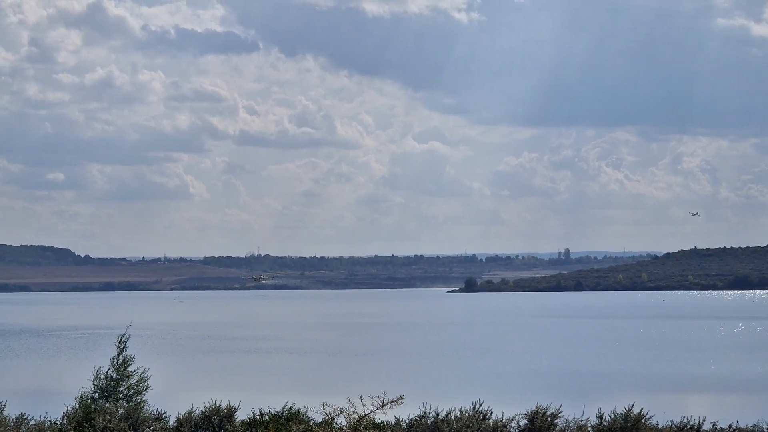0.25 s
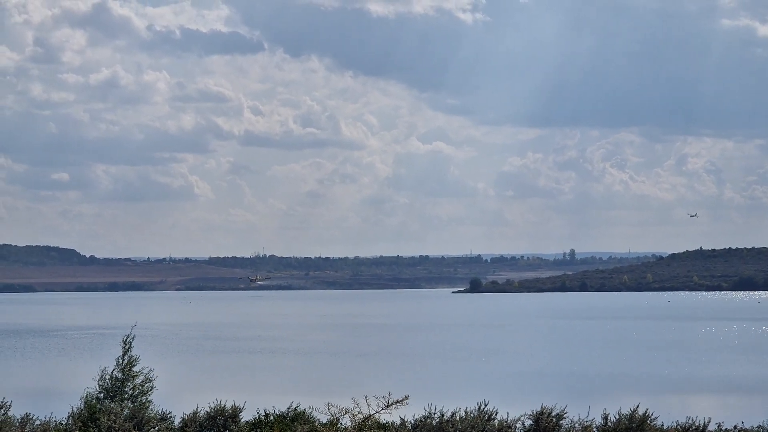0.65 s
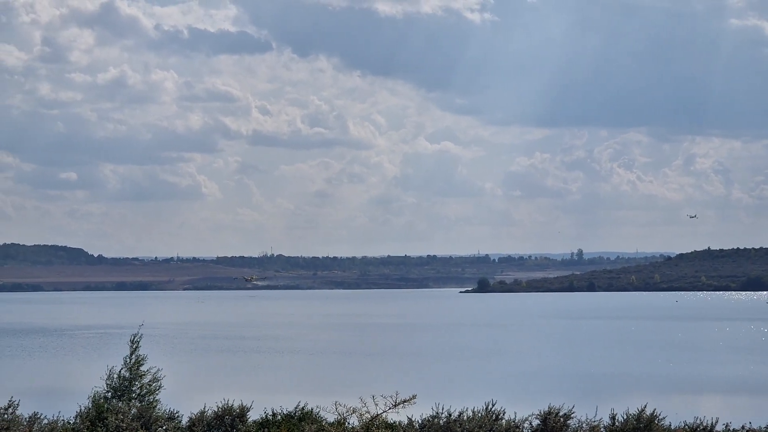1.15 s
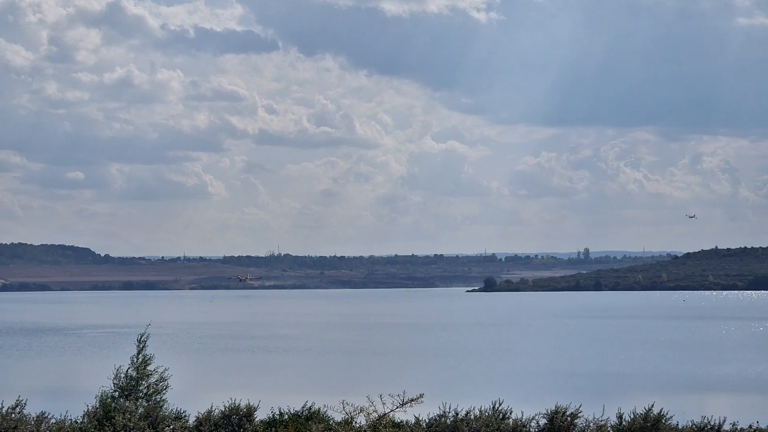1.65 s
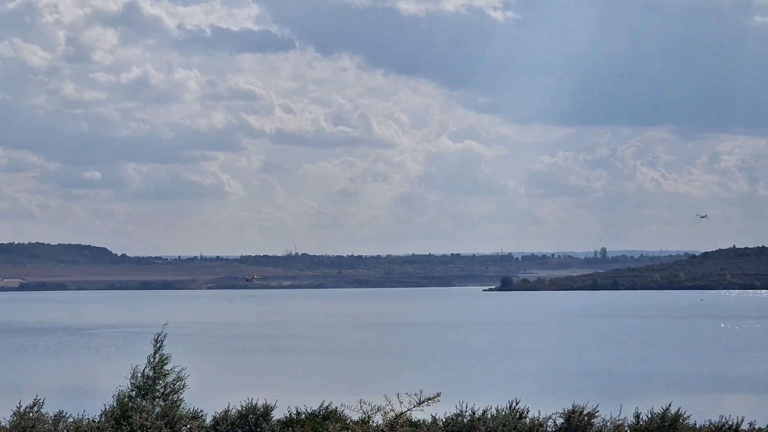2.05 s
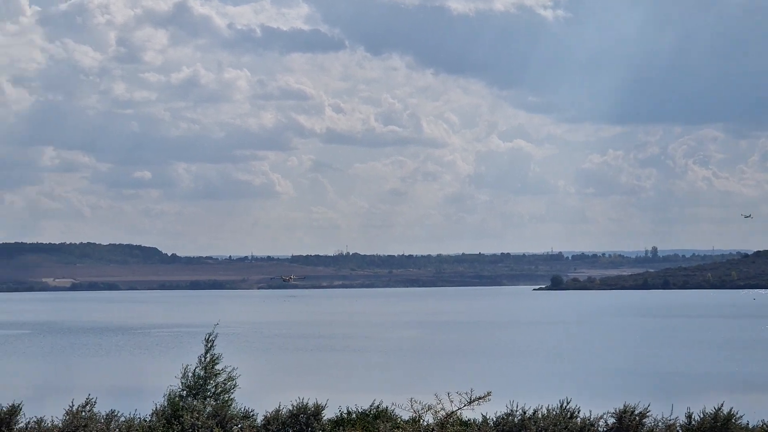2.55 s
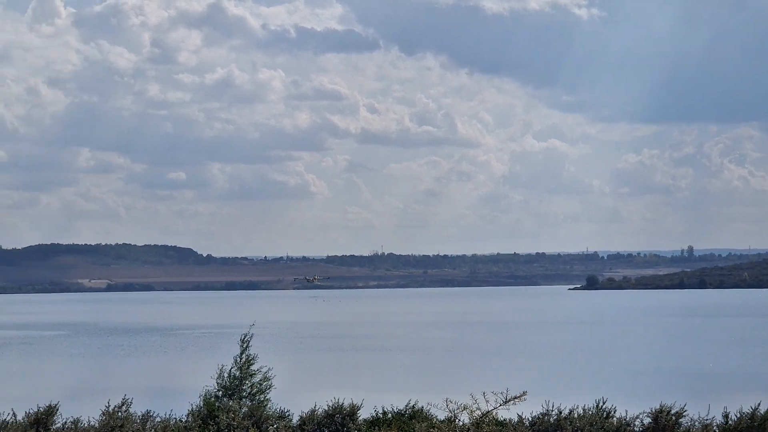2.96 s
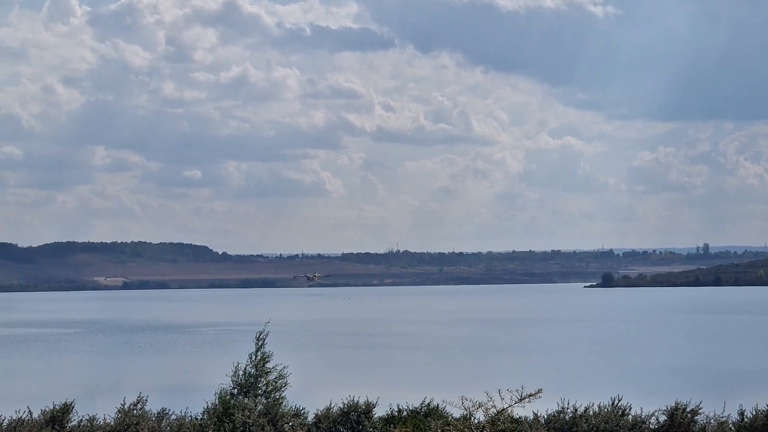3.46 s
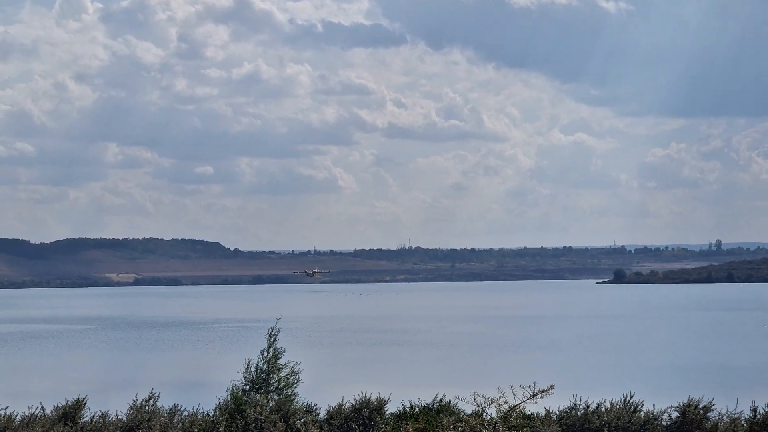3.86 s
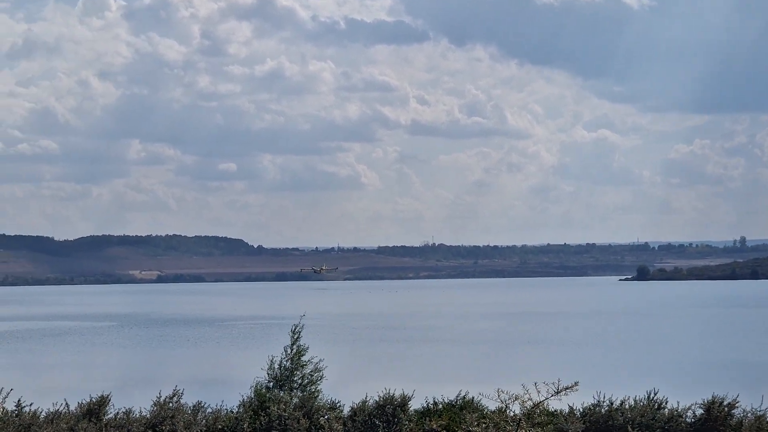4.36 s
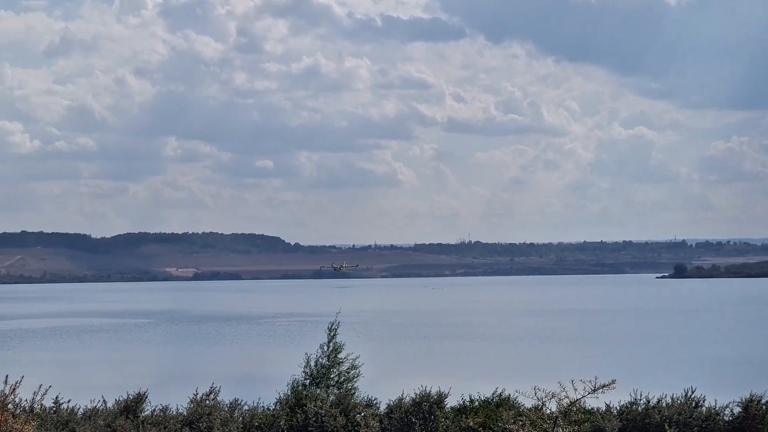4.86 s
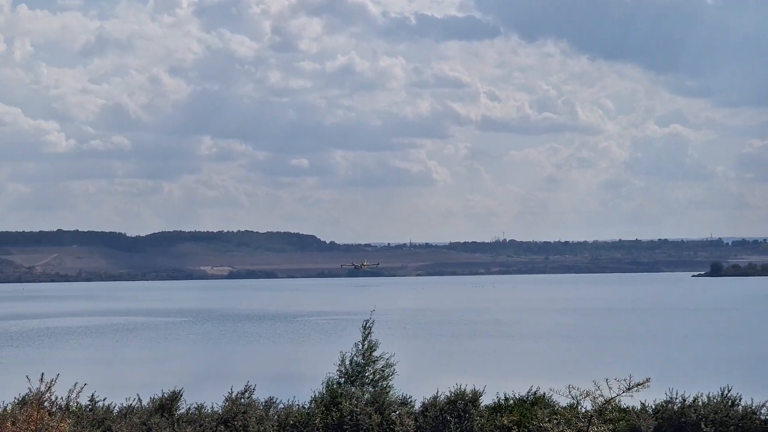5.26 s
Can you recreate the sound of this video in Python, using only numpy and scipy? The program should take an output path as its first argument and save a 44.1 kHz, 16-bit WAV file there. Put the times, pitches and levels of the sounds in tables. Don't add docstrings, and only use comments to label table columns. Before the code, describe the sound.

A steady low drone of propeller blades and uneven engine growl comes in over water, pulsing and drifting, gaining a brighter roar and thin whistling edges as it nears. A stereo microphone in shoreline grass catches light handling-like scuffs, mostly left at first, a dull snap around one second, and a cluster of dry stalk cracks at right just after five seconds. The background is quiet hiss, leaves and low breeze.

```python
import sys
import numpy as np
from scipy import signal
from scipy.fft import rfft, irfft
from scipy.io import wavfile
from scipy.ndimage import uniform_filter1d

SR = 44100
rng = np.random.default_rng(int(sys.argv[2]) if len(sys.argv) > 2 else 0)


def digitize_waveform(pressure):
    field = np.atleast_2d(pressure).T
    bounded = np.clip(field, -1, 1)
    quanta = np.round(bounded * 32767).astype(np.int16)
    wavfile.write(sys.argv[1], SR, quanta)


def decibels_to_gain(level_db):
    exponent = np.asarray(level_db, float) / 20
    return 10 ** exponent


N = 242988
T = np.arange(N) / SR

# (time [s], blade rate [Hz], level [dB])
APPROACH = [(0, 93.55, -33), (.28, 94.2, -31.5), (.43, 93.2, -27.5), (.57, 93.3, -32.5), (.9, 94.06, -28),
            (1.35, 94.12, -33.5), (1.95, 94.23, -32.5), (2.26, 94.28, -28.5), (2.54, 94.33, -28),
            (2.68, 94.35, -31.5), (2.95, 94.2, -29.7), (3.45, 94.62, -33.5), (4.1, 94.65, -31.3),
            (4.38, 94.73, -30), (4.8, 95.22, -23.5), (5.23, 95.5, -22.5), (5.37, 95.77, -23.5),
            (5.51, 95.4, -22)]
# (time [s], roar gain [dB], nearness [0-1], crest of the water echo [Hz])
AIR_PATH = [(0, -2.5, 0.5, 1266), (.5, 2, 0, 1345), (1, 1, 0.12, 988), (1.5, -1.5, 0, 1460),
            (2, 0, 0.1, 1460), (2.4, 1, .2, 1397), (2.7, 1.5, 0.09, 1403), (3, 1.5, 0.41, 1410),
            (3.3, 1.5, 0.4, 1380), (3.7, 4.5, .5, 1440), (4, 5, 0.7, 1450), (4.3, 8, 1, 1493),
            (4.6, 8.5, 1, 1400), (5, 10.5, 0.99, 1210), (5.51, 11.5, 0.6, 1053)]

# (time [s], peak level [dB], length [s])
SECOND_SWELLS = [(.45, -49.5, 0.22), (.9, -44.5, 0.63), (1.7, -47, 0.21), (1.98, -51, 0.14),
                 (2.4, -44, .35), (2.97, -44.5, 0.21), (3.25, -49, .25), (3.53, -45.5, .22),
                 (3.95, -46.5, .5), (4.38, -40.5, 0.35), (4.75, -36.5, .45), (5.15, -33.5, 0.77),
                 (5.51, -35, 0.27)]
THIRD_SWELLS = [
    (.9, -53.5, 0.52),
    (1.65, -55.5, 0.46),
    (2.25, -50, 0.41),
    (3.0, -54, 0.32),
    (3.6, -57, 0.49),
    (4.621, -48.5, 0.62),
    (5.15, -46.5, .9),
]
FOURTH_SWELLS = [
    (1.5, -61.5, 0.34),
    (2.001, -60, .3),
    (2.85, -54.5, .9),
    (4.0, -58, 0.32),
    (5.03, -55, 0.61),
    (5.51, -51, 0.35),
]
SIXTH_SWELLS = [
    (1.8, -64.5, 0.57),
    (2.45, -63.5, .4),
    (3.4, -58.5, .45),
    (4.98, -54.5, 0.56),
]
# (time [s], peak level [dB], length [s])
ORDER_3_SWELLS = [
    (0.195, -47, 0.97),
    (1.001, -43.5, 0.3),
    (1.905, -49.5, 0.66),
    (2.799, -48.5, 1.11),
    (4.488, -53.5, .3),
    (5.099, -55.5, .45),
    (5.51, -43, 0.47),
]
ORDER_5_SWELLS = [(.62, -54.5, 0.34), (1.13, -56.5, 0.17), (1.77, -48.5, .25), (2.45, -50.5, 0.25),
                  (2.9, -41.5, 0.28), (3.25, -38, 0.23), (3.6, -36.5, .3), (3.9, -38.5, .3),
                  (4.24, -38, .2), (4.52, -37, 0.18), (5.51, -44, .2)]
ORDER_6_SWELLS = [
    (2.2, -55, 0.31),
    (3.099, -49.5, 0.68),
    (3.55, -43, 0.48),
    (4.15, -42.5, .6),
    (5.151, -43, 0.75),
    (5.5, -46, 0.23),
]
RESTING_DB = (-56, -66.5, -68.5, -70, -71, -61.5, -66.5)
# (multiple of the blade rate, level against the second [dB])
HIGH_OVERTONES = [(5, -27), (7, -31), (8, -33), (9, -32), (10, -28), (11, -30), (12, -28), (13, -28)]
# (multiple of the shaft rate, level against the exhaust rumble [dB])
FIRING_ORDERS = [
    (2, -23),
    (4.5, -16.5),
    (7, -20),
    (9, -23.5),
    (11, -21),
]

# (frequency [Hz], level [dB per Hz])
RUMBLE_SPECTRUM = [(24, -45.5), (40, -26), (68, -8.5), (104, 1.5), (121, -2.5), (151, -11), (204, -10.5),
                   (427, -29), (570, -38), (697, -59), (800, -34), (1040, -64), (1760, -120)]
# (frequency [Hz], level [dB per Hz])
FAR_ROAR = [(260, -31.5), (450, -2), (551, -0.5), (706, -5), (820, -2.5), (1160, -9.5), (1390, -8),
            (1590, -12), (1930, -16.5), (2700, -42.5), (3510, -62), (5940, -120)]
# (frequency [Hz], level [dB per Hz])
NEAR_ROAR = [(300, -30.5), (450, -6), (580, -1), (760, -10), (1000, -3), (1200, -2.5), (1450, -0.5),
             (1600, -5.5), (1700, -1.5), (1950, -16), (2120, -12.5), (2450, -31.5), (2700, -36),
             (3500, -62)]
# (centre [Hz], half width [Hz])
UPPER_ROAR = (2200, 260)
# (centre [Hz], width [Hz])
WHISTLE_BANDS = [
    (2960, 330),
    (3390, 270),
]
WHISTLE_DB = (-94, -95.5)
# (time [s], peak level [dB], length [s])
LOW_WHISTLE_FLARES = [
    (.15, -77.5, .05),
    (3.42, -83, .2),
    (4.05, -79, .1),
    (5.03, -68, .2),
    (5.24, -68, .1),
    (5.38, -69, .22),
]
# (time [s], peak level [dB], length [s])
HIGH_WHISTLE_FLARES = [
    (.15, -78, .05),
    (3.5, -82, .1),
    (4.13, -74, .12),
    (4.25, -77, .1),
    (4.98, -68.5, .26),
    (5.32, -72, .08),
]

# (frequency [Hz], level [dB per Hz])
FLOOR_SPECTRUM = [(1500, -21.5), (2300, -1), (3200, -0.5), (4200, -10.5), (5200, -14), (6400, -7),
                  (7100, -6.5), (7450, 0), (8600, -1.5), (9500, -11), (11000, -17.5), (15500, -16.5),
                  (17000, -28.5)]
# (frequency [Hz], level [dB per Hz])
BREEZE_SPECTRUM = [(15, -30), (30, -7.5), (45, 11.5), (75, 7.5), (110, 2), (200, -6.5), (400, -8),
                   (800, -52.5)]

# (time [s], peak level [dB], length [s])
GRASS_RUSTLES = [(.17, -82.5, .08), (.29, -86, .2), (.7, -88.5, .25), (1.0, -85.5, 0.19),
                 (1.64, -79.5, 0.083), (2.05, -82.5, 0.18), (2.29, -77.5, .12), (2.57, -85, .15),
                 (3.05, -86.5, 0.28), (3.33, -86, .12), (4.1, -82.5, 0.35), (4.36, -80.5, 0.23),
                 (4.55, -81.5, 0.26), (4.7, -74, 0.13), (4.77, -68.5, 0.081), (4.87, -75.5, 0.081),
                 (5.03, -70.5, 0.12), (5.15, -72.5, 0.18), (5.27, -74, 0.16), (4.93, -80, .12),
                 (5.4, -82, .25), (1.35, -88, .3), (2.76, -87, .2), (.45, -87.5, .12), (3.9, -87, .15),
                 (1.93, -86, .08)]
# (frequency [Hz], level [dB per Hz])
GRASS_SPECTRUM = [(2500, -19.5), (4200, -3.5), (5500, -1.5), (7500, 0.5), (9800, -4), (11000, -2.5),
                  (12200, -7.5), (15500, -6), (17000, -20)]
# (time [s], level [dB], centre [Hz], length [s], left minus right [dB])
CLOSE_SCUFFS = [(0.106, -77.5, 3500, .079, 12), (.13, -75.5, 5600, .035, 12), (.191, -67.5, 2100, 0.032, 9),
                (0.377, -78, 2705, .06, 17), (0.521, -77.5, 2400, .05, 15), (2.019, -76, 2630, .022, 6.5),
                (3.487, -78, 3311, .081, 6.5), (2.599, -86.5, 4455, .03, 3.5), (2.9, -82, 4990, .023, 1),
                (3.119, -76, 5712, 0.069, 9), (4.038, -64.5, 2430, 0.049, 11), (4.047, -73, 3400, .019, 17),
                (4.097, -72.5, 3401, 0.043, 15), (4.098, -74, 2587, .03, 9), (5.105, -69.5, 6700, .05, -8),
                (5.159, -65.5, 5640, 0.057, -4), (5.224, -71.5, 5680, 0.064, -12),
                (5.228, -69, 2590, 0.052, -5)]
# (time [s], peak level [dB], ring [Hz], left minus right [dB])
STALK_SNAPS = [
    (.915, -52.5, 2060, 13),
    (1.638, -56, 2350, 0),
    (1.638, -73, 4628, -2),
    (2.7485, -67, 7212, 0.5),
    (4.665, -63, 7050, -8.5),
    (5.125, -63.5, 6980, -10),
    (5.1423, -39.5, 6300, -9.5),
    (5.147, -56, 6500, -11.5),
    (5.174, -60, 5483, -3),
    (5.18, -45, 5750, -14),
]

# (frequency [Hz], correlation [-1 to 1])
MIC_LIKENESS = [(30, .95), (65, .88), (110, .93), (150, .995), (300, .99), (600, .87), (1250, .9),
                (2500, .58), (5000, .25), (12000, .05)]
# (frequency [Hz], left minus right [dB])
MIC_LEAN = [(100, 0), (300, .2), (1000, .5), (2500, -1), (5000, -1.5), (7500, -1), (9000, -3), (10000, -7),
            (11200, -3), (12300, 2.5), (15000, 3)]


def evened(x):
    return x / np.sqrt(np.mean(x ** 2) + 1e-20)


def read(points, hz):
    f, value = np.transpose(points)
    return np.interp(np.log(hz + 1), np.log(f + 1), value)


def curves(rows, t):
    s, *columns = np.transpose(rows)
    return [np.interp(t, s, column) for column in columns]


def drift(top_hz):
    t = T[::200]
    rates = np.geomspace(top_hz / 10, top_hz, 16)
    slow = sum(np.sin(2 * np.pi * (f * t + rng.random())) / np.sqrt(f) for f in rates)
    return np.interp(T, t, evened(slow))


def swells(rows, rest_db):
    power = decibels_to_gain(rest_db) ** 2
    for s, db, length in rows:
        power = power + decibels_to_gain(db) ** 2 * np.exp(-8 * ((T - s) / length) ** 2)
    return 10 * np.log10(power)


def sides(x, lean_db):
    return np.array([x * decibels_to_gain(lean_db / 2), x * decibels_to_gain(-lean_db / 2)])


def resonate(x, hz, width):
    turn = np.exp(2j * np.pi * hz * np.arange(x.shape[-1]) / SR)
    r = np.exp(-np.pi * width / SR)
    return 2 * (turn * signal.lfilter([(1 - r) ** 2], [1, -2 * r, r * r], x / turn)).real


def air_noise(colour_db, size, patchy_db, likeness, patch_hz=400, patch_s=0.088):
    hz = np.fft.rfftfreq(size, 1 / SR)[:, None]
    t = np.arange(4 * N // size + 5) * size / 4 / SR
    a, b, c, d, patches = rng.standard_normal((len(t), len(hz), 5)).T
    patches = uniform_filter1d(patches, 1 + int(patch_hz / hz[1, 0]), 0)
    patches = evened(uniform_filter1d(patches, 1 + int(patch_s / t[1]), 1))
    same = np.clip(likeness * read(MIC_LIKENESS, hz), -1, 1)
    left = a + 1j * b
    right = same * left + np.sqrt(1 - same ** 2) * (c + 1j * d)
    spectra = np.array([left, right]) * decibels_to_gain(colour_db(hz, t) + patchy_db * patches)
    return evened(signal.istft(spectra, nperseg=size, noverlap=3 * size // 4)[1][:, :N])


def blade_motion():
    blade_hz, _ = curves(APPROACH, T)
    turn = 2 * np.pi * np.cumsum(blade_hz) / SR
    skew = np.interp(T, [0, 2.8, 4.2, 5.5], [-1.4, 1.2, .6, 2.9])
    return turn, skew


def rumble_level():
    return -53 + 2.5 * T


def shaft_tones(turn, skew):
    _, blade_db = curves(APPROACH, T)
    second_db = swells(SECOND_SWELLS, RESTING_DB[0])
    order_5_db = swells(ORDER_5_SWELLS, RESTING_DB[1])
    tones = decibels_to_gain(blade_db) * np.cos(turn) + decibels_to_gain(second_db) * np.cos(2 * turn + skew)
    tones += decibels_to_gain(order_5_db) * np.cos(5 / 4 * turn + 0.28 * drift(3.7))
    fading = (THIRD_SWELLS, FOURTH_SWELLS, SIXTH_SWELLS, ORDER_3_SWELLS, ORDER_6_SWELLS)
    for k, rows, rest_db in zip((3, 4, 6, 3 / 4, 6 / 4), fading, RESTING_DB[2:]):
        level = decibels_to_gain(swells(rows, rest_db) + 2.5 * drift(12.0))
        tones += level * np.cos(k * turn + (k - 1) * skew + .17 * k * drift(8.0))
    for k, db in HIGH_OVERTONES:
        level = decibels_to_gain(second_db + db + 3.0 * drift(6.0))
        tones += level * np.cos(k * turn + (k - 1) * skew + .16 * k * drift(8.0))
    for k, db in FIRING_ORDERS:
        level = decibels_to_gain(rumble_level() + 7.0 + db + 3.1 * drift(2.5))
        tones += level * np.cos(k / 4 * turn + 2.03 * drift(1.6))
    return np.sqrt(2) * tones


def exhaust_rumble():
    rumble = air_noise(lambda hz, t: read(RUMBLE_SPECTRUM, hz), size=4096, patchy_db=2.5, likeness=1,
                       patch_hz=70, patch_s=.1)
    return decibels_to_gain(rumble_level() + 7.5) * rumble


def roar_colour(hz, t):
    _, near, crest_hz = curves(AIR_PATH, t)
    upper_db = 2 + 4 * np.cos(2 * np.pi * (t - 2.6) / 1.75)
    centre_hz, half_width_hz = UPPER_ROAR
    upper = upper_db * np.exp(-((hz - centre_hz) / half_width_hz) ** 2)
    crest = 3.7 * np.exp(-((hz - crest_hz) / 230) ** 2)
    dip = 2.3 * np.exp(-((hz - crest_hz / 2) / 110) ** 2)
    return (1 - near) * read(FAR_ROAR, hz) + near * read(NEAR_ROAR, hz) + upper + crest - dip


def propeller_roar(turn, skew):
    gain_db = curves(AIR_PATH, T)[0]
    roar = air_noise(roar_colour, size=2048, patchy_db=2.4, likeness=1.02, patch_hz=130, patch_s=.14)
    roar /= np.sqrt(uniform_filter1d((roar ** 2).mean(0), 15000))
    hiss = rng.standard_normal((N, 2)).T
    hiss = hiss + 0.84 * hiss[0]
    whistles = 0
    for rows, db, band in zip((LOW_WHISTLE_FLARES, HIGH_WHISTLE_FLARES), WHISTLE_DB, WHISTLE_BANDS):
        level_db = swells(rows, db + 1.5 * gain_db)
        whistles = whistles + decibels_to_gain(level_db) * evened(resonate(hiss, *band))
    chop = 1 + .03 * np.cos(turn + skew) + .06 * np.cos(2 * turn)
    return chop * (decibels_to_gain(gain_db - 55) * roar + whistles)


def aircraft():
    turn, skew = blade_motion()
    return shaft_tones(turn, skew) + exhaust_rumble() + propeller_roar(turn, skew)


def shore_floor():
    hiss = air_noise(lambda hz, t: read(FLOOR_SPECTRUM, hz), size=512, patchy_db=.7, likeness=.6)
    breeze = air_noise(lambda hz, t: read(BREEZE_SPECTRUM, hz), size=4096, patchy_db=4.5, likeness=0.85,
                       patch_hz=60, patch_s=.2)
    gusts = decibels_to_gain(0.84 * drift(7.9))
    return decibels_to_gain(-80) * gusts * hiss + decibels_to_gain(-46.5) * breeze


def rustle():
    noise = air_noise(lambda hz, t: read(GRASS_SPECTRUM, hz), size=256, patchy_db=1.6, likeness=.5)
    grain = decibels_to_gain(1.8 * evened(uniform_filter1d(rng.standard_normal(N), 90)))
    return decibels_to_gain(swells(GRASS_RUSTLES, -90) + 2.5) * evened(grain) * noise


def scuffs():
    out = np.zeros((2, N))
    for s, db, hz, length, lean in CLOSE_SCUFFS:
        crumble_db = 3.4 * evened(uniform_filter1d(rng.standard_normal(4000), 80))
        crumbs = rng.standard_normal(4000) * decibels_to_gain(crumble_db)
        u = np.clip(np.arange(4000) / SR / length, 0, 1)
        width_hz = 54 * (hz * 1e-3) ** 2
        scuff = evened(resonate(crumbs, hz, width_hz)) * np.sin(np.pi * u ** .7)
        out[:, round(s * SR):][:, :4000] += sides(decibels_to_gain(db) * scuff, lean)
    return out


def snaps():
    out = np.zeros((2, N))
    for s, db, hz, lean in STALK_SNAPS:
        tick = rng.standard_normal(600) * np.exp(-np.arange(600) / SR * hz / 1.7)
        snap = resonate(tick, hz, 0.28 * hz)
        if hz > 5000:
            snap = snap + 0.077 * tick
        out[:, round(s * SR):][:, :600] += sides(decibels_to_gain(db) * snap / abs(snap).max(), lean)
    return out


def scene():
    return aircraft() + shore_floor() + rustle() + scuffs() + snaps()


def low_pass(x):
    return signal.sosfilt(signal.butter(12, 15750, fs=SR, output="sos"), x)


def record(dry):
    lean_db = read(MIC_LEAN, np.fft.rfftfreq(N, 1 / SR))
    lean = decibels_to_gain(lean_db * np.array([[.5], [-.5]]))
    mix = irfft(rfft(dry) * lean, N)
    return low_pass(mix)


dry = scene()
out = record(dry)
digitize_waveform(out)
```